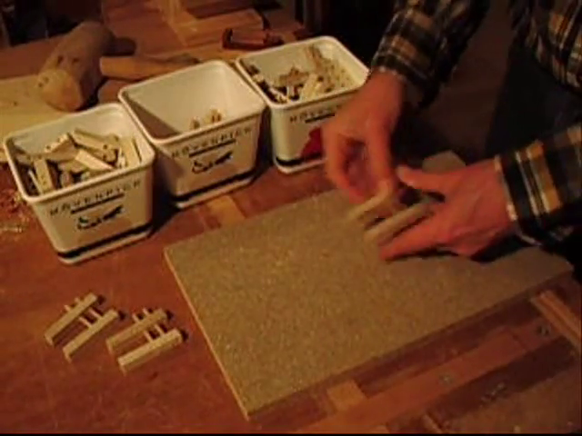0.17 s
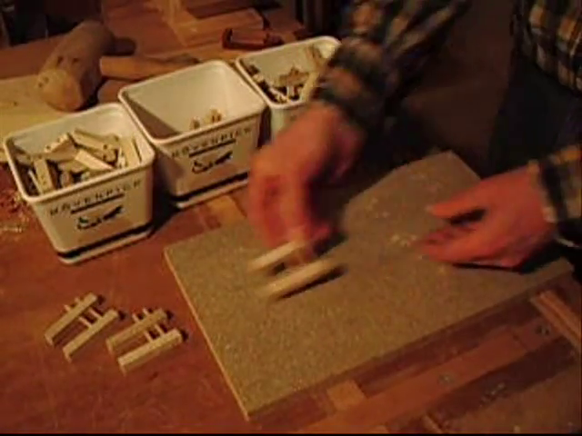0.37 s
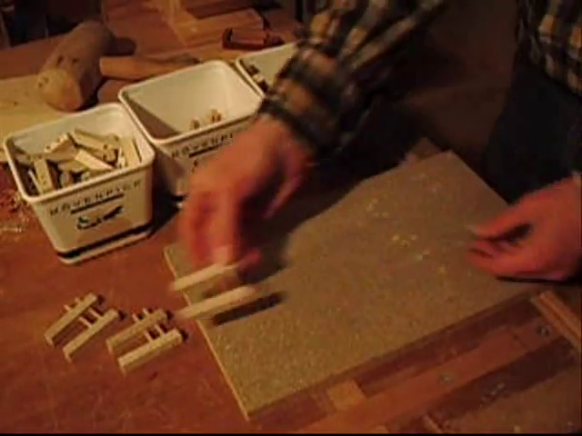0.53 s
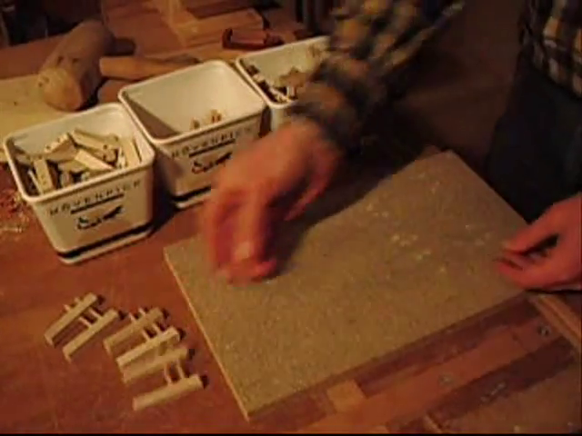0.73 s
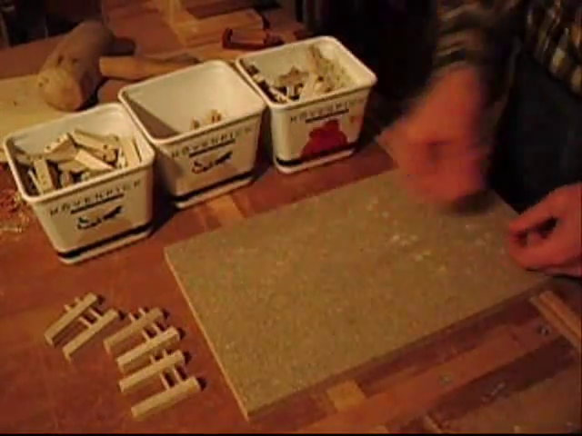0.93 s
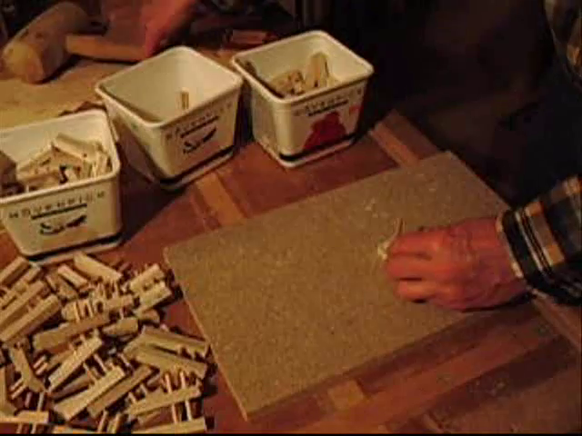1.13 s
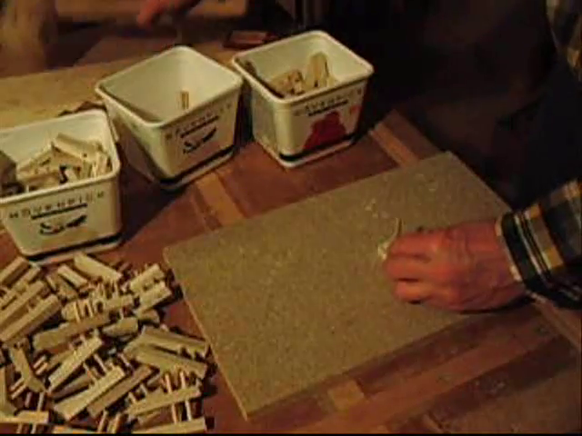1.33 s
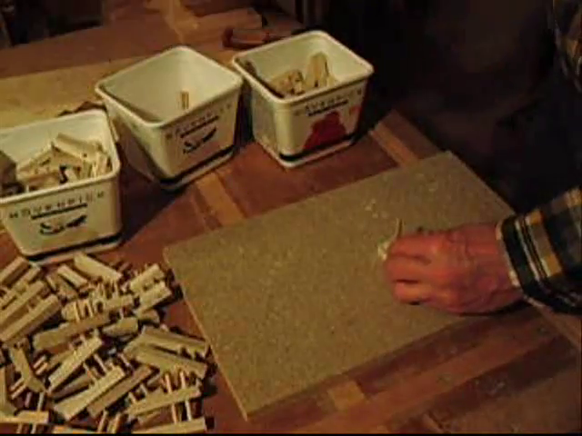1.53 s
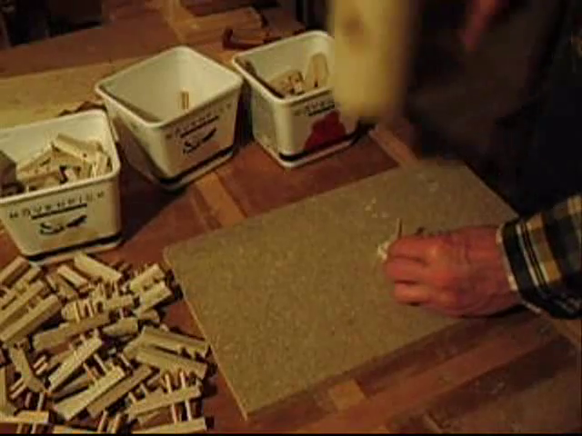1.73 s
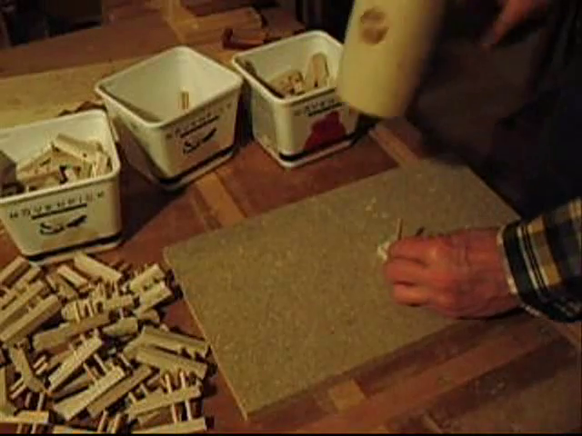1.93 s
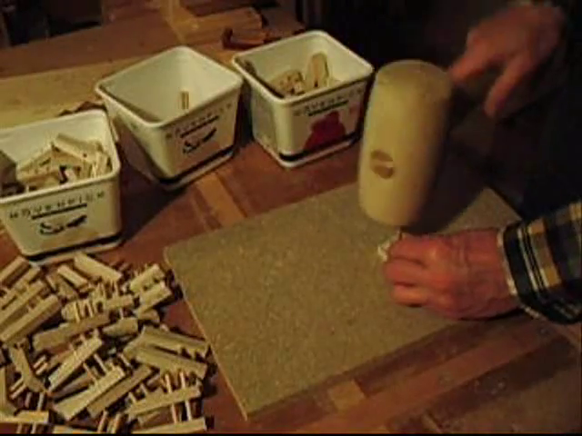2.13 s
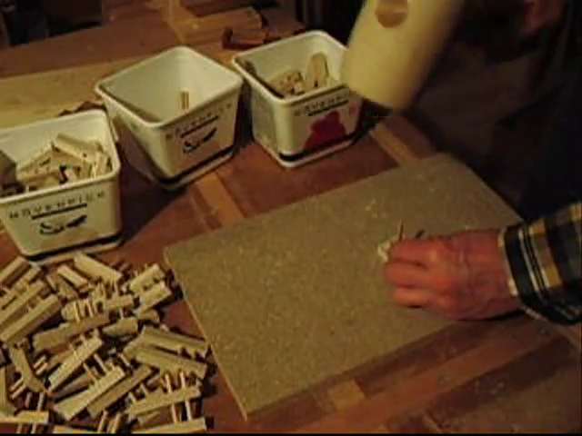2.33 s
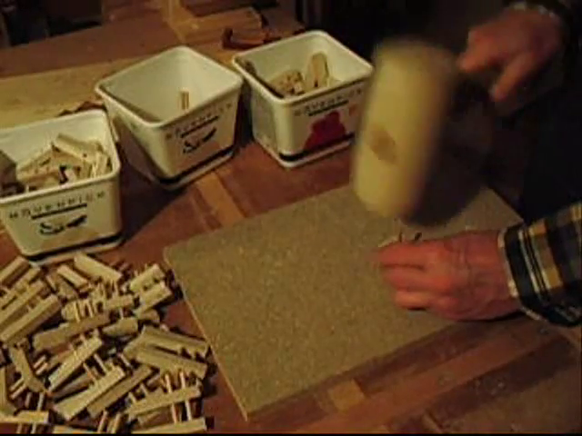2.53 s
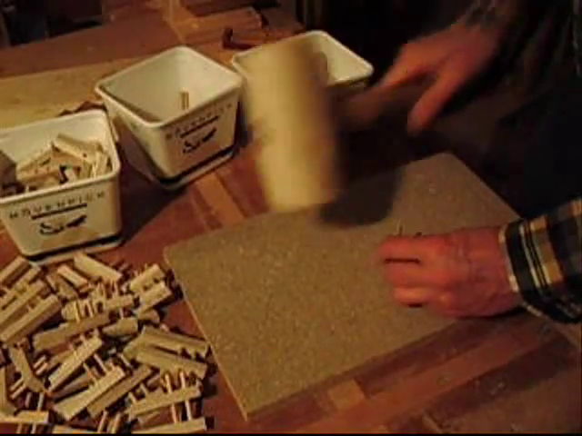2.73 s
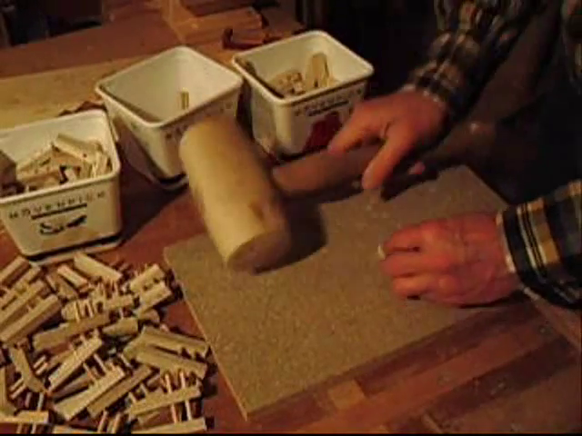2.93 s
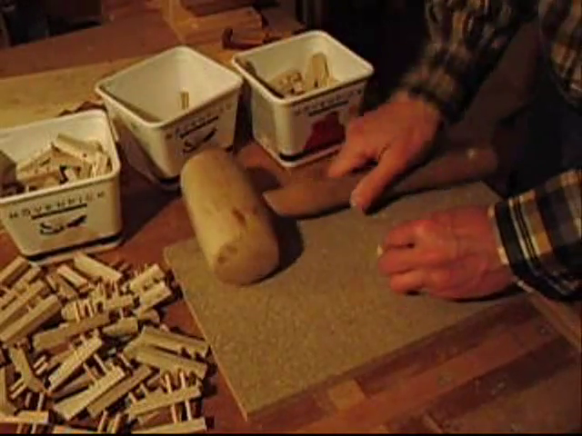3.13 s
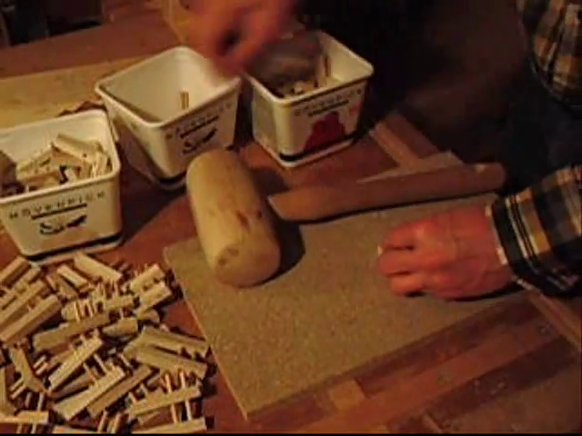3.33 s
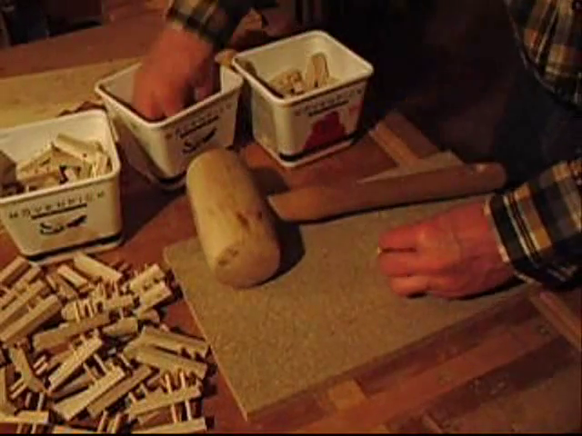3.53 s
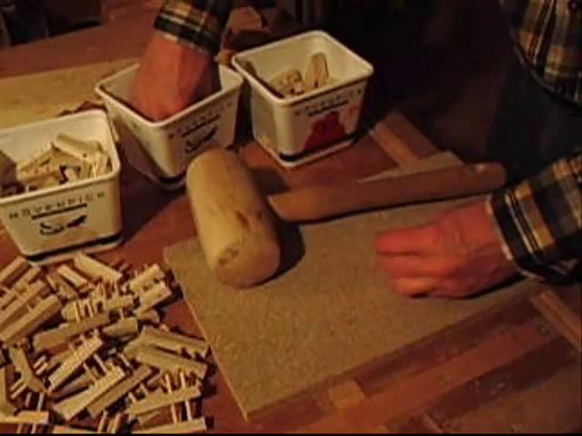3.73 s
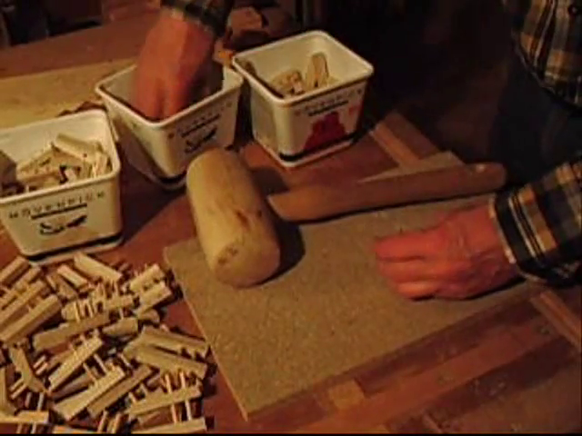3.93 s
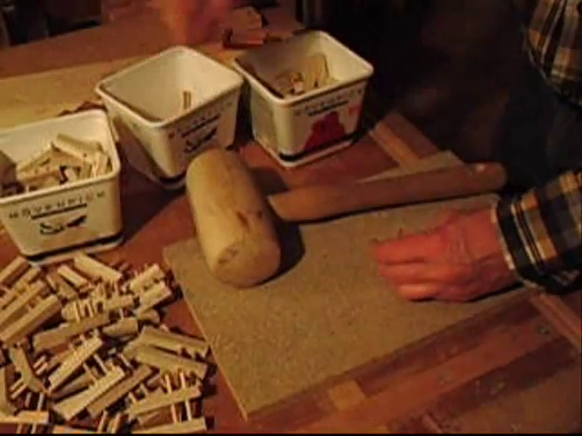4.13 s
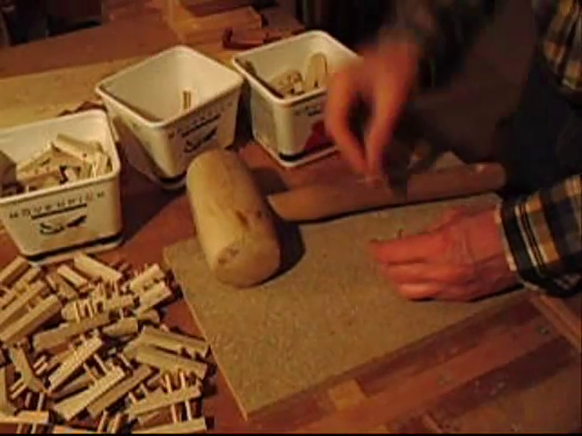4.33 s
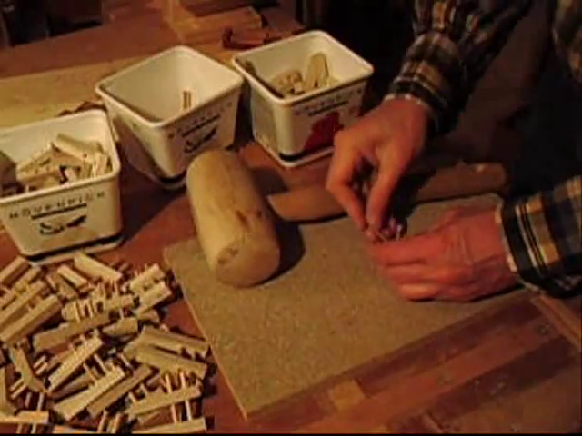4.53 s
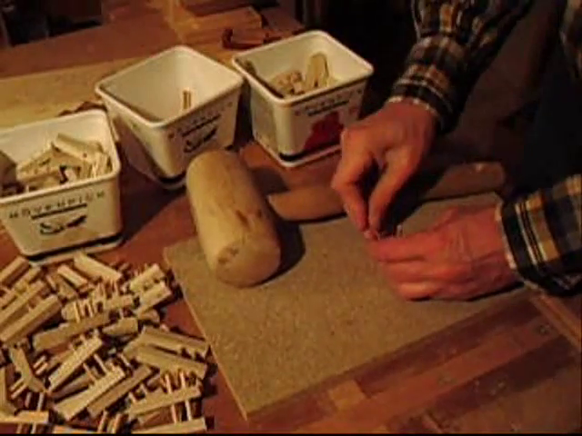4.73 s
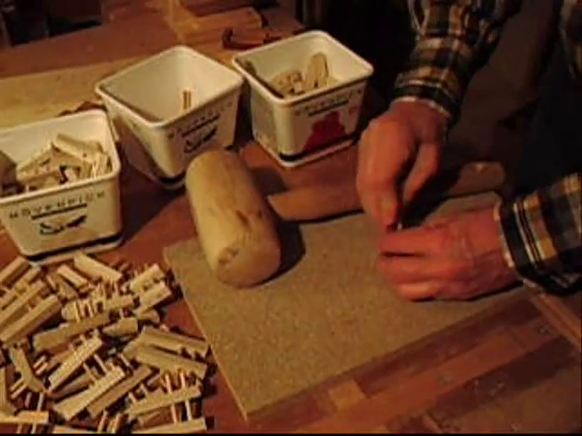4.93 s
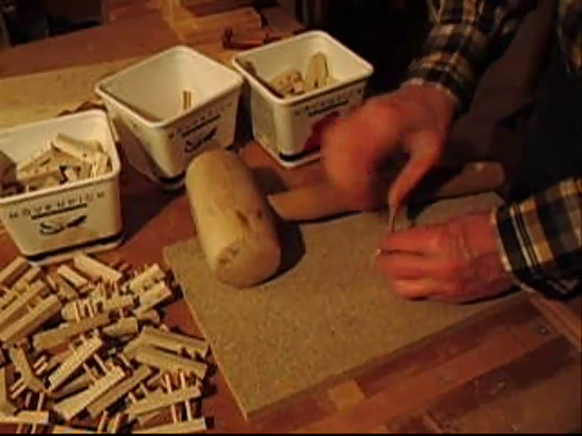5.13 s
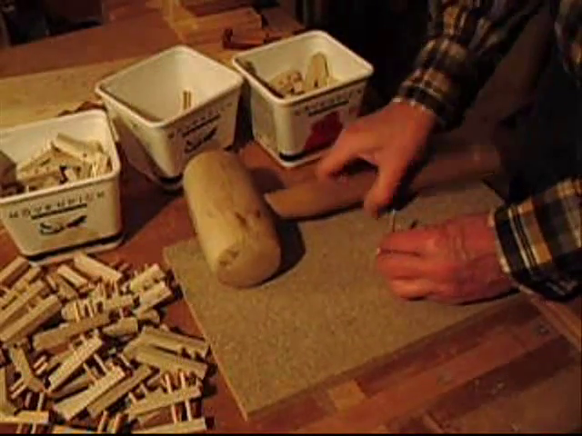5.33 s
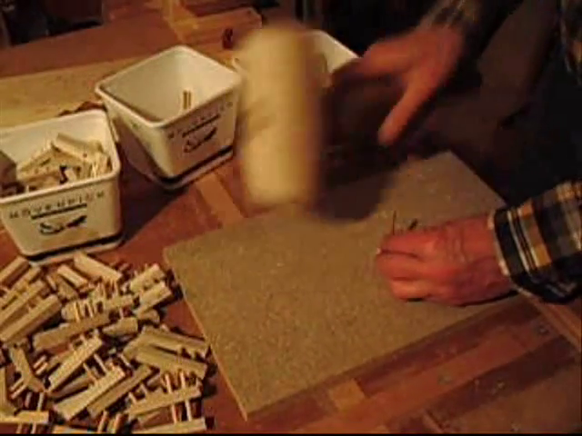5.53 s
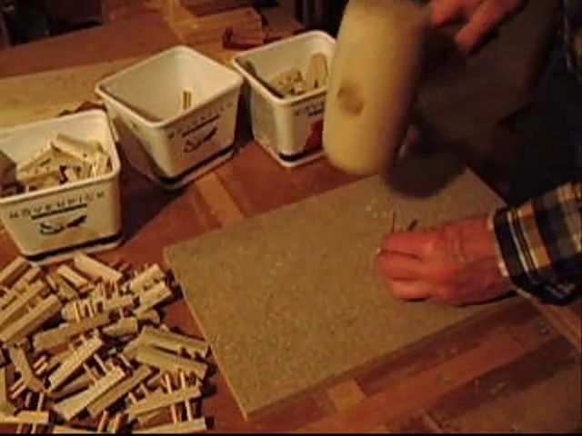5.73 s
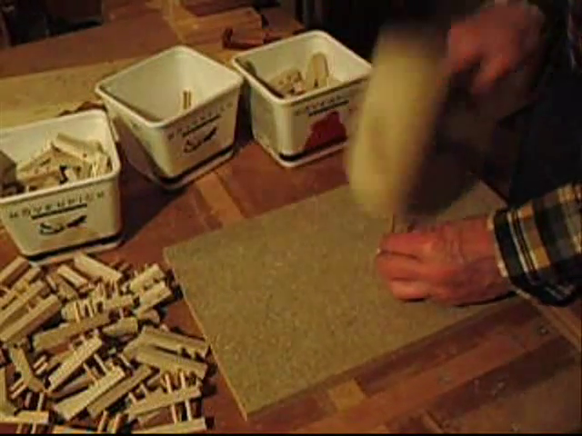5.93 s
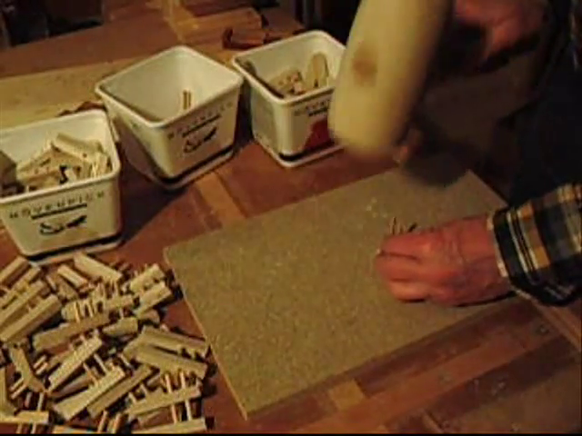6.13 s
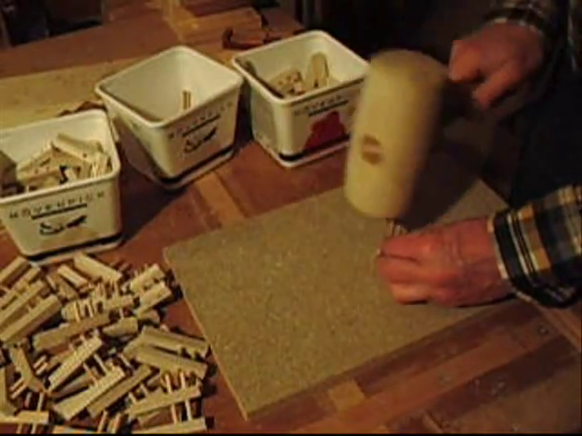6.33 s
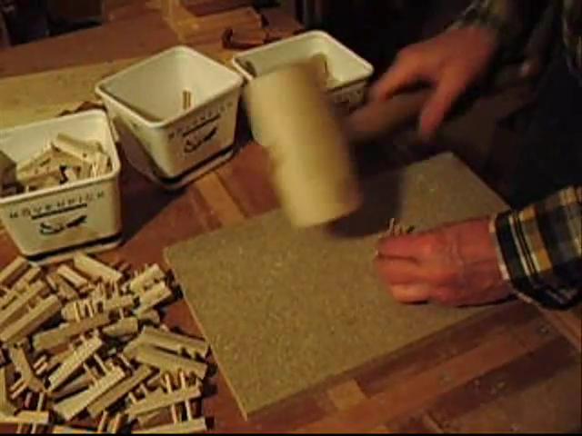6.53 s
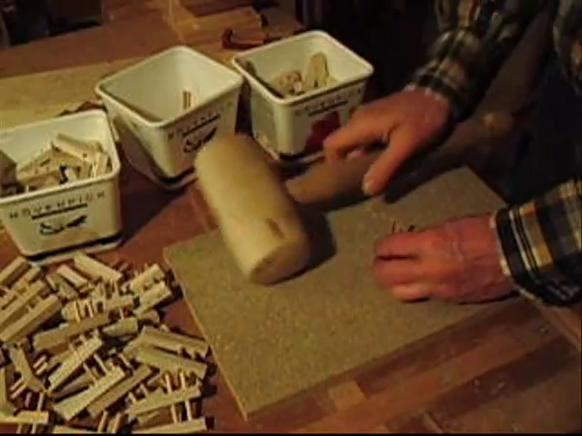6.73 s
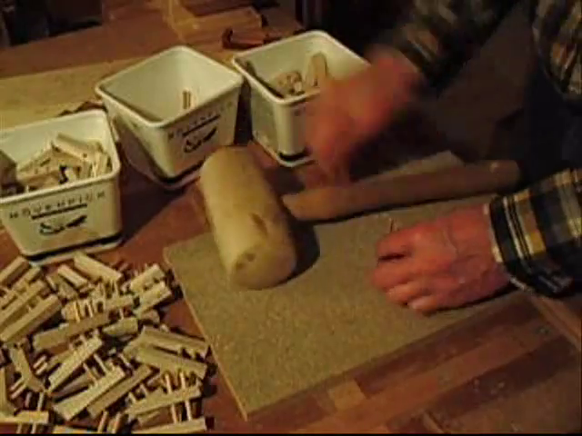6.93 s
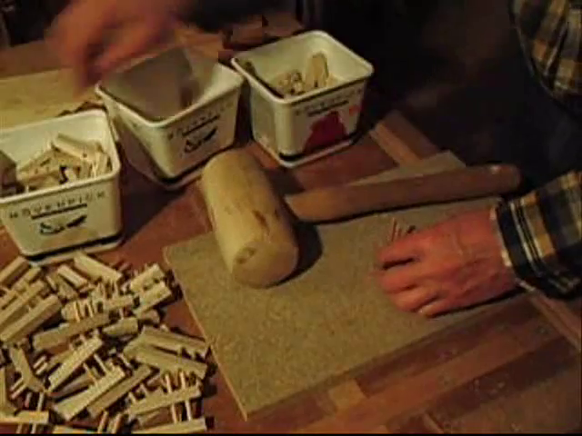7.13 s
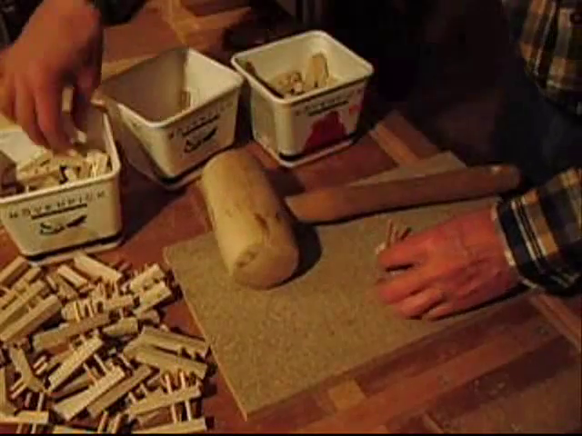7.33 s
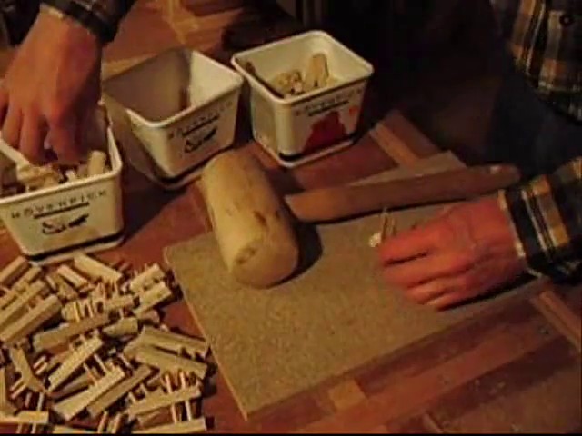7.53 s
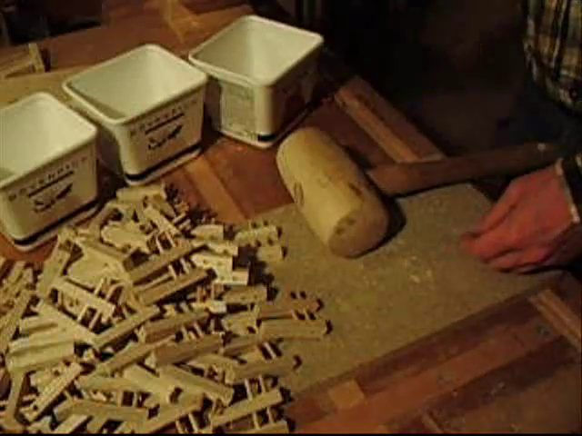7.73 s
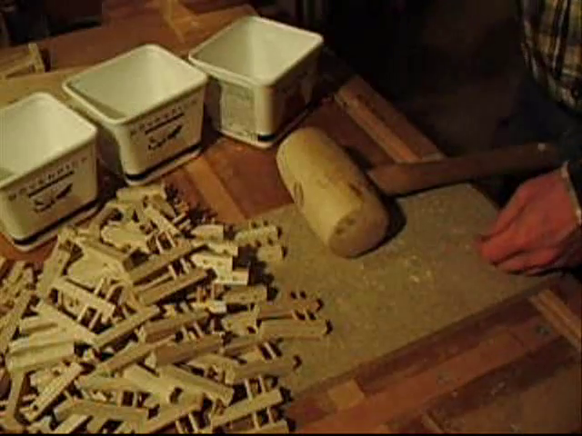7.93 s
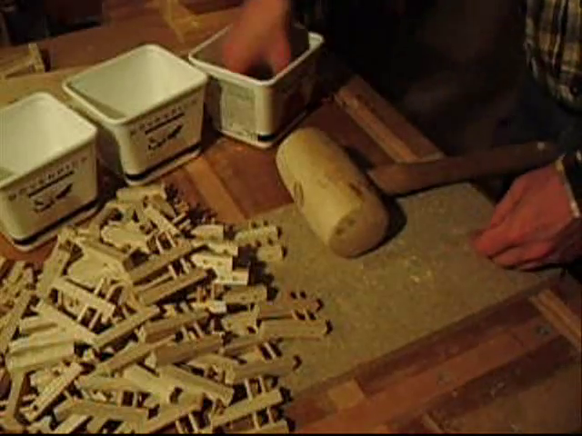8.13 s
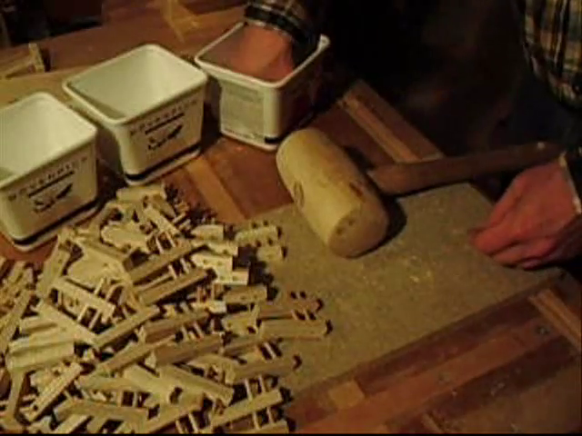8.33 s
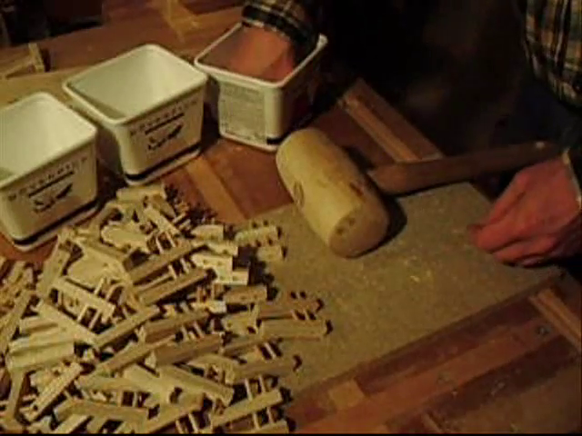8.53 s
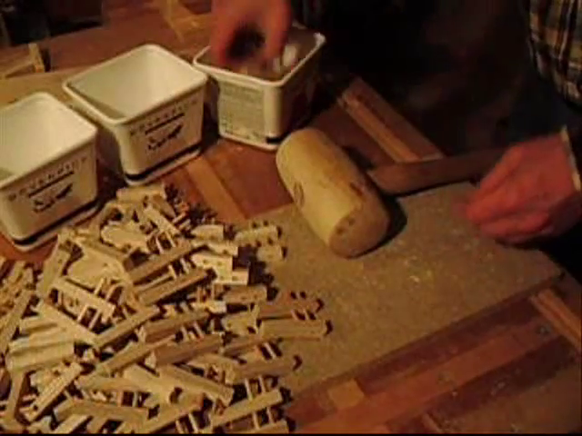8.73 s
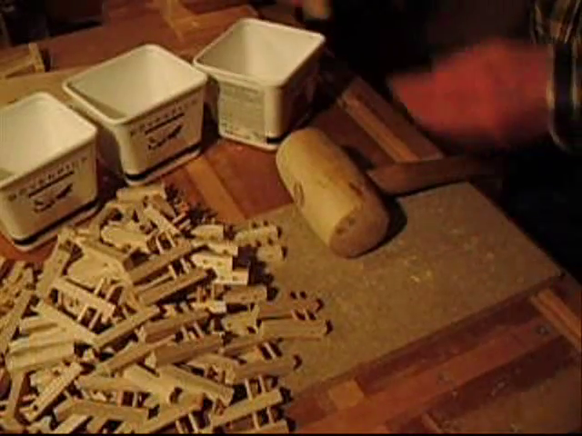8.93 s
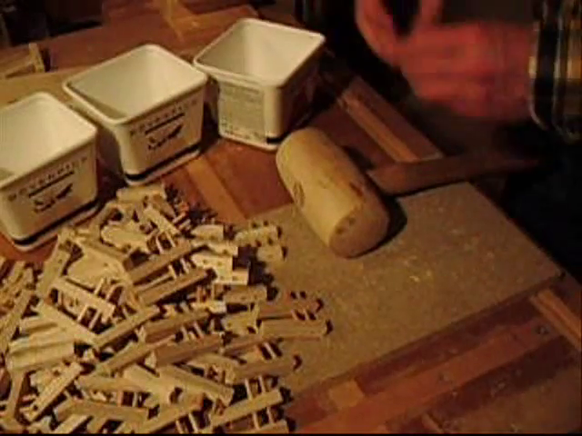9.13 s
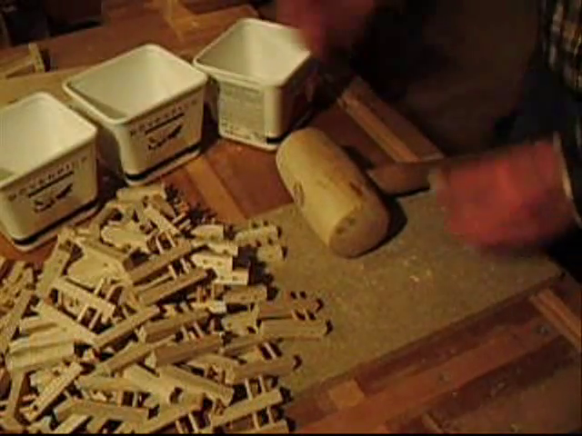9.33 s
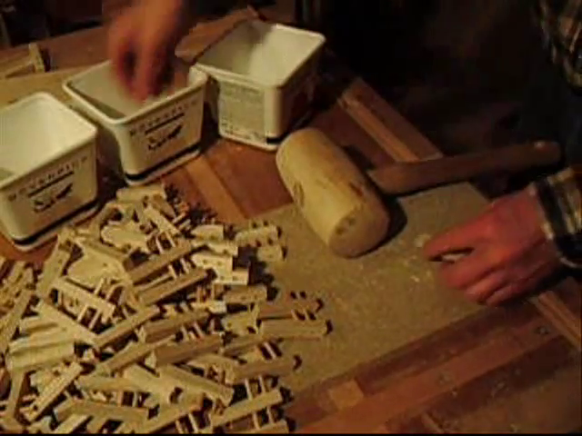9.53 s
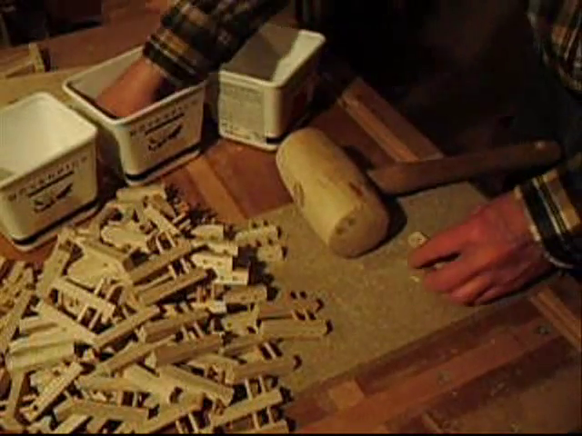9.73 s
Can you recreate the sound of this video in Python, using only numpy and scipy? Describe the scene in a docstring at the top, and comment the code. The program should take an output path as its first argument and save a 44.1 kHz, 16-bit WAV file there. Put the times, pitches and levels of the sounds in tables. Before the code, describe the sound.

In a small workshop, a light wooden piece clatters onto a pile. A wooden mallet strikes a peg twice, the second blow harder, then is laid on the bench with bouncing knocks. Fingers rummage through wooden parts in a plastic tub. Two more blows follow, the mallet clatters down again, and soft bumps and rattles come from the tubs. The close microphone overloads slightly on the hardest knocks, over faint hiss and hum.

```python
"""In a small workshop, wooden clamps are assembled on a board at a workbench.
A mallet drives each peg home with two blows and is laid down, head first; a finished clamp is tossed
on the pile; fingers rummage in plastic tubs. Each impact excites a crack of heavily damped modes and
a few longer resonances, followed by the room's reverberation. Beneath lie brushing cloth, air noise,
hum and a faint motor. The close microphone overloads on the hardest knocks."""
import sys
import numpy as np
from scipy import signal
from scipy.fft import rfft, irfft, next_fast_len
from scipy.io import wavfile
from scipy.ndimage import uniform_filter1d, map_coordinates

SR = 44100
rng = np.random.default_rng(int(sys.argv[2]) if len(sys.argv) > 2 else 0)


def store_wav(level_fs):
    """Save 16-bit WAV to argv[1]."""
    pcm = np.round(np.clip(np.atleast_2d(level_fs), -1, 1) * 32767)
    wavfile.write(sys.argv[1], SR, pcm.T.astype(np.int16))


N = 435708
SIZE = 32768  # samples in one impact
T, HZ = np.arange(SIZE) / SR, np.fft.rfftfreq(SIZE, 1 / SR)  # time and frequency axes of one impact
TIME = np.arange(N) / SR


# two blows per peg, the second harder: (time [s], crack level [dB], delay to seating [s],
# bench level [dB], board level [dB], delay to rebound [s], rebound gain [dB])
BLOWS = [(2.2402, 15, 0.0019, -17, -9, 0.013, -6.5), (2.5906, 22.5, .0025, -16.5, -1.5, .018, -13),
         (6.09, 12, .007, -22, -13.5, .035, -3), (6.4251, 22, .003, -19.5, 5, 0.031, -8.5)]
# contact spectrum of a blow: (frequency [Hz], level [dB])
BLOW_SPECTRUM = [(30, -50), (70, 0), (120, 5.5), (190, 15.5), (420, 5), (900, 9.5), (1400, 5), (2000, 4.5),
                 (2600, -0.5), (4500, -2), (7000, -6.5), (11000, -10.5), (15500, -15.5)]
# modes of the bench and of the board: (frequency [Hz], level [dB], T60 [s])
BENCH_MODES = [(59.7, -21.5, 1), (90, 6.5, 0.1), (132, 1, 0.13), (187.4, -3.5, 0.13), (256.6, -0.5, .17),
               (305, -14, 0.38), (1252, 2, 0.071), (2010, 2.5, 0.041)]
BOARD_MODES = [(183.6, -15, 0.088), (331, 1, 0.048), (370, -2, 0.033), (416, -3.5, 0.085),
               (458.5, 2.5, 0.036), (548, -2, 0.016), (704, -14.5, 0.092), (940, -28, 0.055)]

def mallet_blows():
    """Momentum transfer: the struck peg shakes bench and board as it seats, and again on the rebound."""
    track = np.zeros(N)
    for start, crack_db, seat_s, bench_db, board_db, rebound_s, rebound_db in BLOWS:
        strike = amp(crack_db) * crack(BLOW_SPECTRUM, t60=0.023, attack=0.003)
        add(track, start, reverberate(strike, wet_db=-1.5))
        for delay, db in [(seat_s, 0), (rebound_s, rebound_db)]:
            dull_crack = amp(crack_db - 6.5) * crack(BLOW_SPECTRUM, t60=0.021, tilt=-1.5, attack=0.00083)
            bench = amp(bench_db) * ring(BENCH_MODES, attack=0.00066)
            board = amp(board_db) * ring(BOARD_MODES, attack=0.00048)
            add(track, start + delay, amp(db) * reverberate(dull_crack + bench + board, wet_db=-7.5))
    return track


# landings of the mallet head: (time [s], level [dB])
HEAD_HITS = [(3.1615, 22), (3.2078, 19.5), (3.222, 2.5), (6.8335, 19), (6.911, 17.5), (6.947, 16),
             (6.959, 10.5)]
# contact spectrum: (frequency [Hz], level [dB])
HEAD_SPECTRUM = [(30, -23), (70, -13), (170, -3), (260, 6), (750, 12), (1200, 1), (1700, 0.5), (2600, -9.5),
                 (4500, -13), (6400, -12), (7400, -4.5), (8800, -9.5), (10500, -17), (15500, -14.5)]
# modes of the head: (frequency [Hz], level [dB], T60 [s])
HEAD_MODES = [(253, -6, 0.09), (257, -0.5, 0.19), (339, 0, 0.079), (425, 4, 0.039), (503, -4.5, 0.12),
              (682, 0.5, 0.15), (762, -4, 0.11), (796, -15, 0.22), (962, 1, 0.039), (1575, -13.5, 0.064),
              (7250, -23, 0.2), (7650, -18, 0.1), (8500, -17.5, 0.11), (8900, -25, 0.12)]

def mallet_head():
    """Impulse excitation: the head lands and rocks, each contact starting its modes afresh."""
    return impacts(HEAD_HITS, HEAD_SPECTRUM, HEAD_MODES,
                   ring_db=-26.5, t60=0.024, attack=0.0032, wet_db=-5.5)


# bounces of the handle: (time [s], level [dB], tilt [dB/octave])
HANDLE_HITS = [(3.3108, 19, 0.5), (3.357, 11, 1), (3.382, 6, -2), (7.0325, 18.5, -0.5), (7.099, 7.5, -1.5),
               (7.1355, 6.5, 0.5), (7.155, 3, -9.5)]
# contact spectrum: (frequency [Hz], level [dB])
HANDLE_SPECTRUM = [(30, -26), (75, -9), (130, 5.5), (260, 14), (450, 9.5), (750, 11.5), (1200, 13),
                   (1600, 7), (2200, 5.5), (3200, -2), (4500, -5.5), (7000, -3.5), (9500, -7),
                   (15500, -14.5)]
# modes of the handle: (frequency [Hz], level [dB], T60 [s])
HANDLE_MODES = [(180, -15.5, 0.14), (254, 1.5, 0.087), (315, -2, 0.19), (388, 1, 0.075), (453, -0.5, 0.067),
                (1005, -3, 0.064), (1210, -7, 0.1), (1372, -10, 0.13), (1650, -13, 0.098)]

def mallet_handle():
    """Inelastic collision: the handle drops and loses energy at every bounce."""
    return impacts(HANDLE_HITS, HANDLE_SPECTRUM, HANDLE_MODES,
                   ring_db=-27.5, t60=0.027, attack=0.00033, wet_db=-6.5)


# bounces on the pile: (time [s], level [dB], tilt [dB/octave])
CLAMP_HITS = [(.763, 9.5, 0.5), (.770, 4.5, -2), (.7835, -3, 2.5), (.7915, 5.5, 2), (.846, -5, 0),
              (.8785, 2, 2.5), (.9424, -6, -3.5), (.9758, -16, 0.5)]
# contact spectrum: (frequency [Hz], level [dB])
CLAMP_SPECTRUM = [(40, -29), (150, -3.5), (400, 2), (750, 14.5), (1050, 8.5), (1500, 9), (3100, 6.5),
                  (4000, -2), (5000, 2.5), (7000, -8), (11000, -9), (15500, -12)]
# modes of the clamp: (frequency [Hz], level [dB], T60 [s])
CLAMP_MODES = [(457, -12, 0.18), (698, 5, 0.059), (790, -9, 0.067), (1063, -1.5, 0.05), (1426, -5.5, 0.12),
               (3050, 3, 0.022)]

def tossed_clamp():
    """Free vibration: the wooden clamp rings briefly after each bounce on the pile."""
    return impacts(CLAMP_HITS, CLAMP_SPECTRUM, CLAMP_MODES,
                   ring_db=-29, t60=0.019, attack=0.0028, wet_db=-7.0)


# loose parts strike the tubs: (time [s], level [dB])
TUB_HITS = [(3.678, 5.5), (3.700, 5), (3.711, 0.5), (3.731, 1), (3.812, 1.5), (3.823, -4), (3.834, -1.5),
            (3.895, -3.5), (3.9974, -13), (4.162, -21), (7.592, -14), (7.645, -20), (7.672, -15.5),
            (9.824, -3), (9.838, -1)]
# contact spectrum: (frequency [Hz], level [dB])
TUB_SPECTRUM = [(40, -5), (150, 1), (350, 9.5), (550, 6.5), (880, 16), (1400, 4), (2800, 6), (4000, -4),
                (5400, -0.5), (7000, -6), (11000, -8.5), (15500, -10)]
# modes of a tub: (frequency [Hz], level [dB], T60 [s])
TUB_MODES = [(343, -7, 0.018), (700, -3, 0.11), (812, 2.5, 0.1), (919, 0, 0.14), (963, -1, 0.06),
             (965, -5, 0.073)]

def tub_hits():
    """Shell resonance: the plastic walls ring when a loose part strikes them."""
    return impacts(TUB_HITS, TUB_SPECTRUM, TUB_MODES, ring_db=-33, t60=0.029, attack=0.0011, wet_db=-3.5)


# a hand stirs the parts: (time [s], duration [s], level [dB])
STIRS = [(3.705, 0.18, -36), (3.95, 0.032, -37.5), (7.51, 0.13, -45.5), (8.315, 0.076, -39.5),
         (8.48, 0.15, -52.5), (9.83, .05, -41)]
# a peg is drawn over the others: (time [s], duration [s], level [dB])
SLIDES = [(3.812, 0.018, -28.5), (8.484, 0.0059, -28), (8.745, 0.027, -45.5)]
# spectrum of sliding: (frequency [Hz], level [dB])
SLIDE_SPECTRUM = [(100, -27), (550, -1), (820, 10), (1400, -5.5), (2100, -0.5), (2900, 7), (3400, -3),
                  (4100, -10), (5000, 1), (6500, -16.5), (11000, -9.5), (15500, -15)]

def rummaging():
    """Superposition of random impacts: tumbling parts drum on the tub; sliding pegs rasp more finely."""
    tub_response = crack(TUB_SPECTRUM, t60=0.015) + amp(-33.5) * ring(TUB_MODES)
    rattle = unit(signal.fftconvolve(ticks(per_second=370, spread_db=1.0), tub_response)[:N])
    rattle *= swell(STIRS, rise=0.14, fall=0.21)
    rasp = coloured(ticks(per_second=1400, spread_db=0.0), SLIDE_SPECTRUM)
    rasp *= swell(SLIDES, rise=0.078, fall=0.15)
    return reverberate(rattle + rasp, wet_db=-6.0)


# knuckles meet a nearly empty tub: (time [s], level [dB])
BUMPS = [(8.2933, -2.5), (8.359, -3.5), (8.429, -23), (9.829, -3.5)]
# contact spectrum: (frequency [Hz], level [dB])
BUMP_SPECTRUM = [(40, -10), (130, 11), (240, 13.5), (450, 13), (720, 20), (1000, 9), (1500, 2), (2800, -11),
                 (5000, -10), (9000, -7.5), (15500, -24)]

def knuckle_bumps():
    """Soft contact: a knuckle excites mainly the lower frequencies of the tub."""
    return impacts(BUMPS, BUMP_SPECTRUM, TUB_MODES, ring_db=-43.5, t60=0.013, attack=0.00034, wet_db=-6)


# the lying mallet rolls or is nudged: (time [s], level [dB], tilt [dB/octave])
NUDGES = [(.338, -19, 1), (5.4012, -22, 6), (5.4128, 3.5, 0.5), (5.513, -9.5, -2), (5.535, -16, -4.5),
          (7.27, -14, -5), (7.327, -12.5, -1), (7.406, -13.5, -2.5), (7.46, -11.5, 1), (7.54, -9, -0.5),
          (7.668, -8.5, 1)]
# contact spectrum: (frequency [Hz], level [dB])
NUDGE_SPECTRUM = [(30, -39), (150, -14), (300, 20.5), (450, 12.5), (700, 4), (1200, -5), (3000, -6.5),
                  (7000, -15.5), (15500, -21)]

def mallet_nudges():
    """Plate resonance: light knocks from the lying mallet sound the modes of the board."""
    return impacts(NUDGES, NUDGE_SPECTRUM, BOARD_MODES,
                   ring_db=-25.5, t60=0.012, attack=0.00039, wet_db=-5.5)


# pegs being handled, and one faint tick at 3.03 s: (time [s], level [dB], tilt [dB/octave])
SMALL_CLICKS = [(.1252, -27, 4.5), (1.2192, -25, 2.5), (1.3065, -21.5, 3.5), (3.0346, -20, 4.5),
                (4.812, -6.5, 2.5), (9.789, -3.5, 2)]
# contact spectrum: (frequency [Hz], level [dB])
PEG_SPECTRUM = [(40, -14), (300, 11), (750, 2), (1100, 12), (1750, 1.5), (2250, 5), (3000, -4.5),
                (5000, -7), (7000, -15), (10500, -18), (15500, -19)]
# modes of a peg: (frequency [Hz], level [dB], T60 [s])
PEG_MODES = [(1063, -8, .06), (1530, -12, 0.053), (2090, 4, 0.039)]

def small_clicks():
    """Rapid damping: high, short-lived modes, like those of a small peg, are heard as a click."""
    return impacts(SMALL_CLICKS, PEG_SPECTRUM, PEG_MODES,
                   ring_db=-33, t60=0.023, attack=0.0011, wet_db=-8.5)


# strokes over the board: (time [s], duration [s], level [dB])
BRUSHES = [(1.33, 0.073, -57), (1.645, 0.033, -54), (2.82, 0.1, -55.5), (5.47, 0.044, -57),
           (5.66, 0.12, -57), (6.66, 0.052, -52.5)]
# spectrum of cloth and skin: (frequency [Hz], level [dB])
CLOTH_SPECTRUM = [(500, -24), (2700, -1.5), (3600, 5.5), (4700, 3.5), (5800, -25), (8000, -8), (10000, -19),
                  (12000, -1), (15500, -22)]

def brushing():
    """Friction noise: sleeve and fingers hiss unevenly across the board."""
    hiss = coloured(rng.standard_normal(N), CLOTH_SPECTRUM)
    flicker = amp(3.8 * wobble(33))
    return swell(BRUSHES, rise=0.32, fall=0.45) * hiss * flicker


# room air and hiss: (frequency [Hz], relative spectral density [dB])
AIR_SPECTRUM = [(12, -55), (20, 1.5), (59, -2.5), (76, -6.5), (252, -9.5), (478, -16.5), (549, -11),
                (667, -17), (834, -17), (1200, -20), (1410, -20.5), (3540, -26), (3960, -27.5),
                (4680, -29.5), (15500, -39)]
# motor partials: (frequency [Hz], level [dB])
MOTOR_PARTIALS = [(98, -59), (272, -61.5), (570.6, -67), (839.8, -66), (1109, -66), (1410, -70),
                  (3365, -75.5)]
# spells of mains hum: (time [s], duration [s], level [dB])
HUM_SPELLS = [(0, 1.09, -51), (7.72, 2.4, -52)]

def background():
    """Continuous and line spectra: air noise, a phase-modulated motor whine and 50 Hz mains hum."""
    air = amp(-47.5) * coloured(rng.standard_normal(N), AIR_SPECTRUM)
    air = filtered(air, lambda hz: 1 - 0.29 * np.exp(-(hz / 55) ** 4))  # the deepest rumble is weak
    whine = sum(amp(db) * np.sin(2 * np.pi * hz * TIME + 1.1 * wobble(6.3)) for hz, db in MOTOR_PARTIALS)
    hum = swell(HUM_SPELLS, rise=0.14, fall=0.14) * np.sin(2 * np.pi * 50 * TIME)
    return air + np.sqrt(2) * (whine + hum)  # rms to peak amplitude


# reverberation time of the workshop: (frequency [Hz], T60 [s])
ROOM_T60 = [(60, 0.48), (250, 0.22), (500, 0.35), (1000, 0.31), (3000, 0.35), (8000, 0.31), (15000, 0.31)]
# initial spectrum of the reverberation: (frequency [Hz], level [dB])
ROOM_SPECTRUM = [(60, 2), (250, 0.5), (1000, 0), (3000, -4), (8000, -0.5), (15000, 2)]

def reverberate(x, wet_db, build_s=0.0084):
    """Diffuse reflection: the direct sound gains a tail that builds up, then decays band by band."""
    hz, t, bands = signal.stft(rng.standard_normal(SIZE), SR, nperseg=256)
    decay = fade(t, along(ROOM_T60, hz)[:, None])
    gain = amp(along(ROOM_SPECTRUM, hz))[:, None]
    tail = signal.istft(bands * decay * gain, SR, nperseg=256)[1][:SIZE]
    tail *= 1 - np.exp(-(T / build_s) ** 2)
    return x + amp(wet_db) * signal.fftconvolve(x, tail / np.linalg.norm(tail))[:len(x)]


def impacts(rows, spectrum, modes, ring_db, t60, attack, wet_db):
    """Linear response: crack, ring and reverberation all scale with the strength of each contact."""
    track = np.zeros(N)
    for start, db, *tilt in rows:
        hit = crack(spectrum, t60, *tilt, attack=attack) + amp(ring_db) * ring(modes)
        add(track, start, amp(db) * reverberate(hit, wet_db))
    return track


def crack(spectrum, t60, tilt=0, attack=0.0003, ragged_db=1.8):
    """Modal overlap: many heavily damped modes merge into a burst of noise."""
    burst = rfft(rng.standard_normal(SIZE) * fade(T, t60) * (1 - np.exp(-T / attack)))
    # the burst's own envelope is divided out, so that the body sets the spectrum
    envelope = np.sqrt(np.abs(uniform_filter1d(np.abs(burst) ** 2, size=220)))
    # the point of contact favours some upper modes and misses others
    ragged = ragged_db * np.minimum(HZ / 2000, 1) * map_coordinates(rng.standard_normal(100), [HZ / 230])
    slope = tilt * np.log2(np.maximum(HZ, 450) / 1000)
    return irfft(burst * causal(amp(along(spectrum, HZ) + slope + ragged) / envelope))


def ring(modes, scatter_db=-1.0, detune=0.0084, attack=0.00049):
    """Normal modes: damped sinusoids, excited a little differently at each contact point."""
    hz, db, t60 = np.transpose(modes)[:, :, None]
    level, pitch, side = rng.standard_normal((len(modes), 3)).T[:, :, None]
    t = T[:SIZE // 2]
    amplitude = np.sign(side) * amp(db + scatter_db * level)
    waves = amplitude * fade(t, t60) * np.sin(2 * np.pi * hz * (1 + detune * pitch) * t)
    return np.pad(waves.sum(0) * (1 - np.exp(-t / attack)), (0, SIZE // 2))


def causal(gain):
    """Minimum phase: a response with this gain in which nothing precedes the hit."""
    cepstrum = irfft(np.log(np.maximum(gain, 1e-6)))
    cepstrum[1:SIZE // 2] *= 2
    cepstrum[SIZE // 2 + 1:] = 0
    return np.exp(rfft(cepstrum))


def ticks(per_second, spread_db):
    """Poisson process: tiny, independent collisions."""
    occurs = rng.random(N) < per_second / SR
    return occurs * rng.choice([-1, 1], N) * amp(spread_db * rng.standard_normal(N))


def swell(rows, rise, fall):
    """Exponential envelope: each row grows 60 dB in rise seconds, holds, and drops 60 dB in fall."""
    return sum(amp(db) * fade(np.maximum(start - TIME, 0), rise)
               * fade(np.maximum(TIME - start - duration, 0), fall) for start, duration, db in rows)


def fade(t, t60):
    """Exponential decay, 60 dB down after t60."""
    return np.exp(-np.log(1000) * t / t60)


def wobble(rate):
    """Spline interpolation of rate random values a second."""
    return map_coordinates(rng.standard_normal(int(N * rate / SR) + 4), [TIME * rate])


def filtered(x, gain):
    """Linear filtering: the spectrum of x times gain(frequency)."""
    size = next_fast_len(N + 8192)
    return irfft(rfft(x, size) * gain(np.fft.rfftfreq(size, 1 / SR)), size)[:N]


def coloured(x, spectrum):
    """Spectral shaping of x, at rms 1."""
    return unit(filtered(x, lambda hz: amp(along(spectrum, hz))))


def along(points, hz):
    """Interpolation on a logarithmic frequency axis."""
    frequencies, values = np.transpose(points)
    return np.interp(np.log(hz + 1), np.log(frequencies + 1), values)


def add(track, start, sound):
    """Superposition of a sound on the track, from start seconds."""
    part = track[max(round(start * SR), 0):][:len(sound)]
    part += sound[:len(part)]


def amp(db):
    """Decibels to amplitude ratio."""
    return 10 ** (np.asarray(db) / 20)


def unit(x):
    """Normalisation to rms 1."""
    return x / np.sqrt(np.mean(x ** 2) + 1e-20)


def scene():
    """Superposition: the pressures of all sources add in one channel."""
    mallet_at_rest = mallet_head() + mallet_handle() + mallet_nudges()
    handling = tossed_clamp() + small_clicks() + tub_hits() + knuckle_bumps()
    return (mallet_blows() + mallet_at_rest + handling + rummaging() + brushing() + background())[None]


# narrow treble notches of the recorder near 4, 8 and 12 kHz: (frequency [Hz], width [Hz], gain [dB])
TREBLE_NOTCHES = [(3995, 350, -7), (8005, 356, -10), (12020, 200, -18)]

def record(dry):
    """Filtering and saturation: the treble is notched, peaks overload, and the band is limited."""
    notched = filtered(dry[0], lambda hz: amp(sum(db * np.exp(-((hz - centre) / width) ** 2)
                                                  for centre, width, db in TREBLE_NOTCHES)))
    saturated = notched / (1 + np.abs(notched) ** 8) ** (1 / 8)
    return filtered(saturated, lambda hz: 1 / (1 + (hz / 15650) ** 160))[None]


dry = scene()
out = record(dry)
store_wav(out)
```